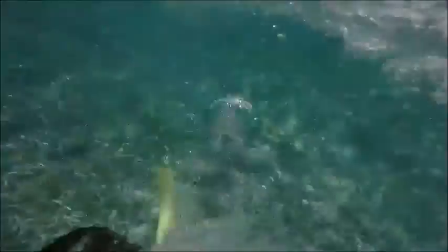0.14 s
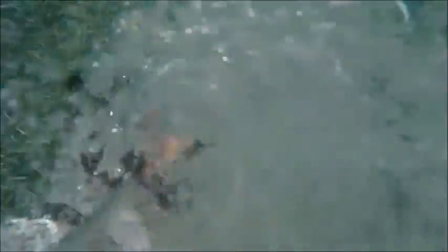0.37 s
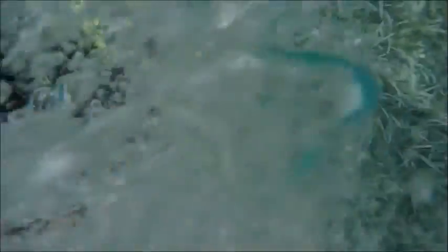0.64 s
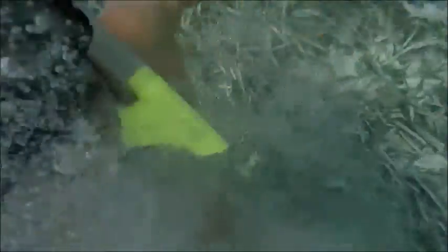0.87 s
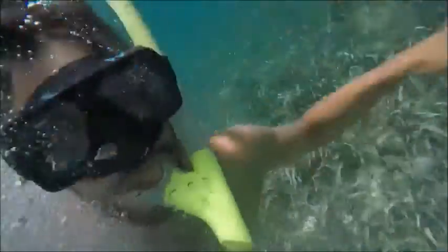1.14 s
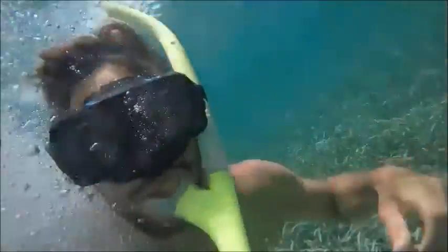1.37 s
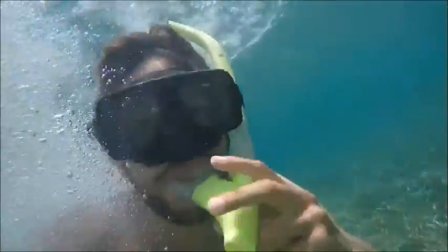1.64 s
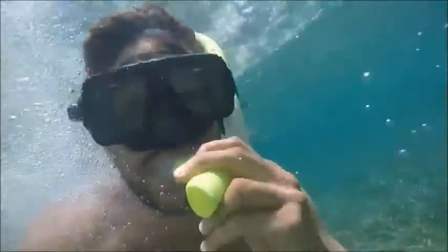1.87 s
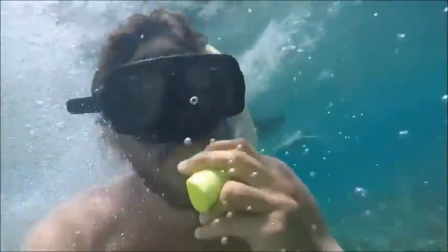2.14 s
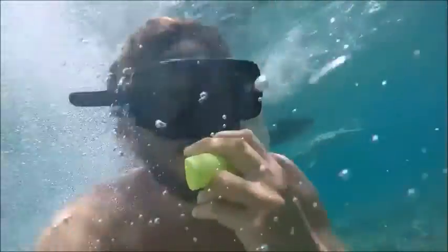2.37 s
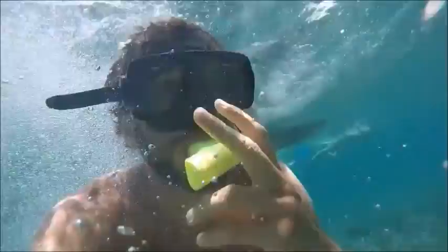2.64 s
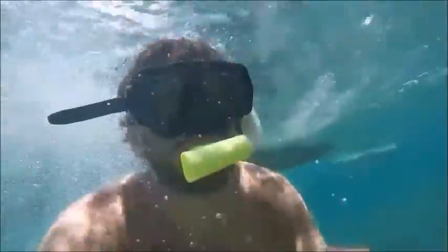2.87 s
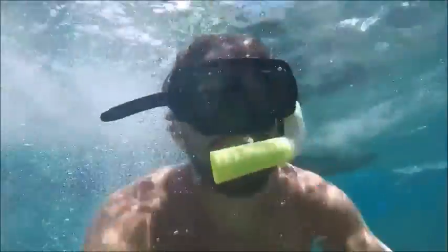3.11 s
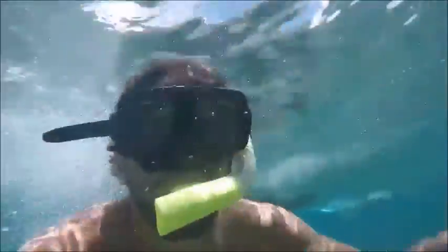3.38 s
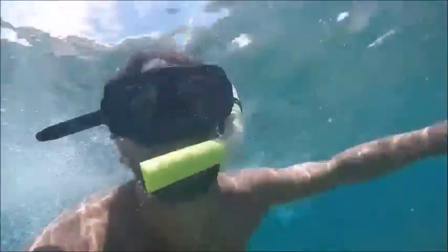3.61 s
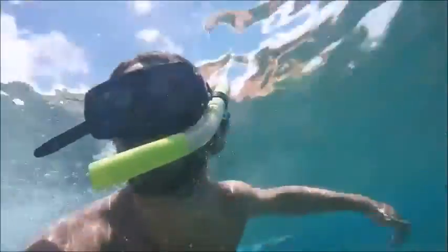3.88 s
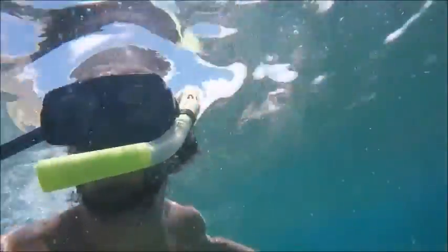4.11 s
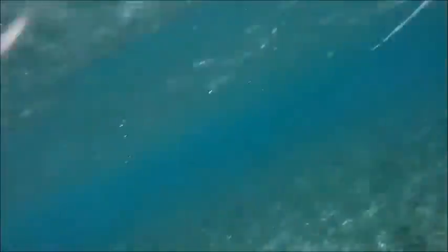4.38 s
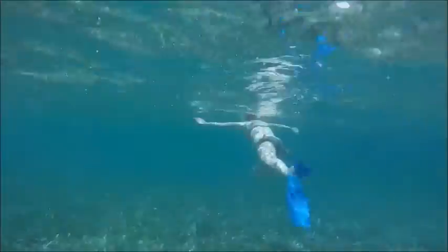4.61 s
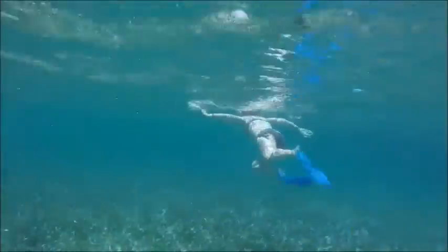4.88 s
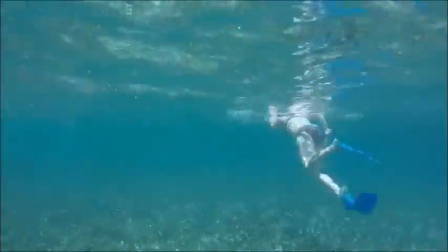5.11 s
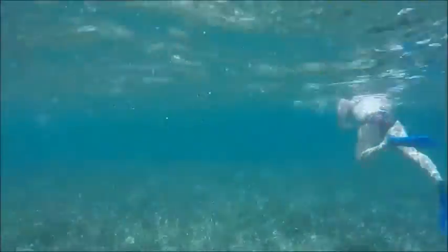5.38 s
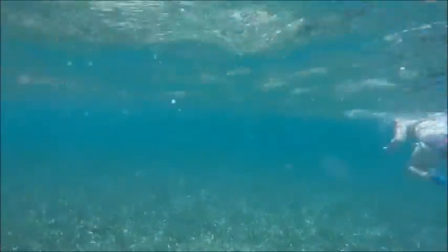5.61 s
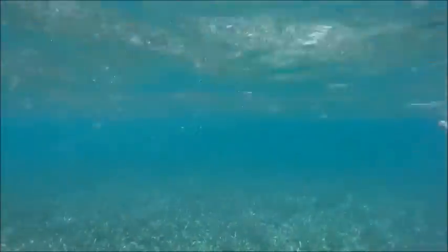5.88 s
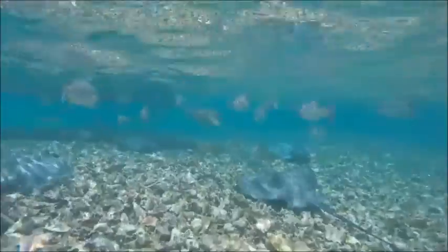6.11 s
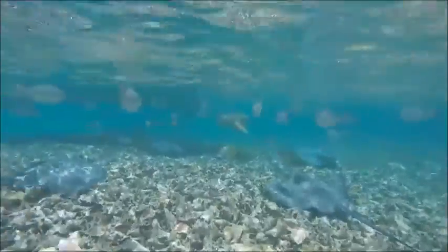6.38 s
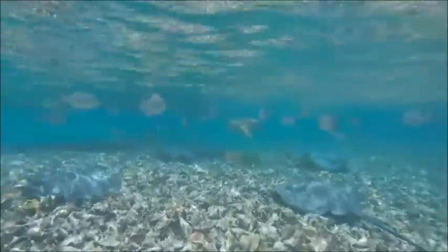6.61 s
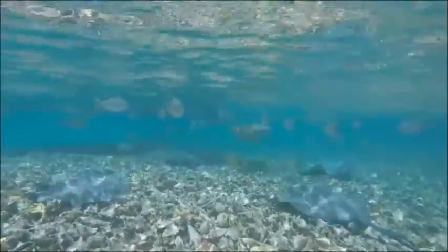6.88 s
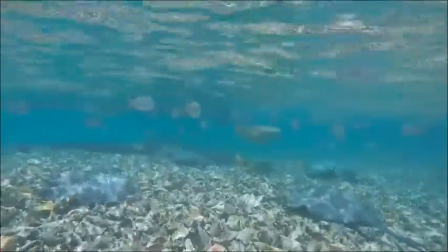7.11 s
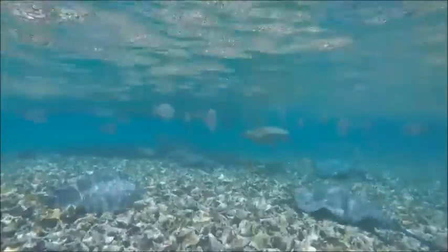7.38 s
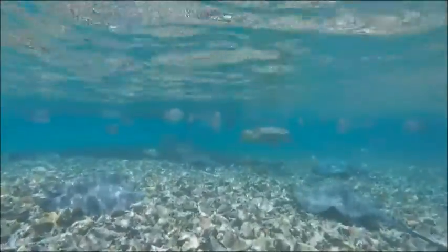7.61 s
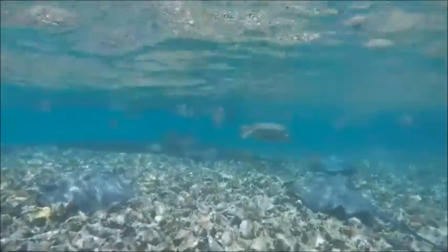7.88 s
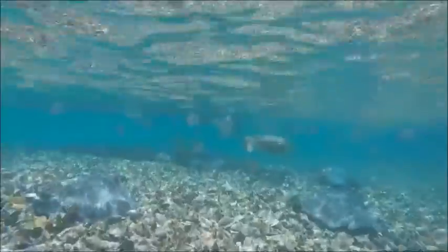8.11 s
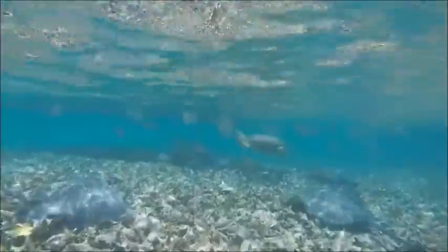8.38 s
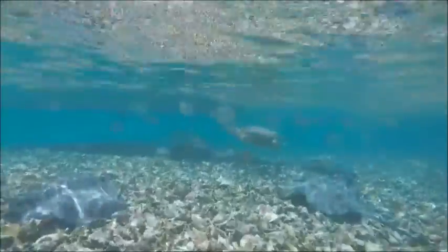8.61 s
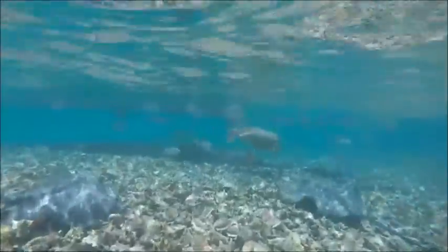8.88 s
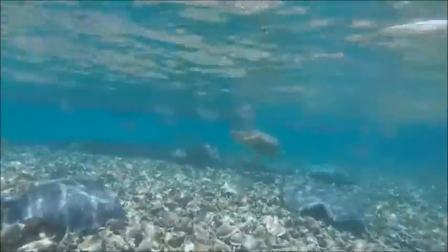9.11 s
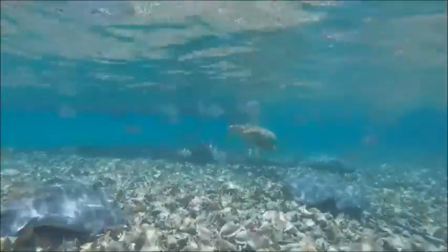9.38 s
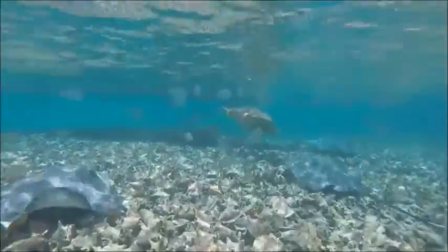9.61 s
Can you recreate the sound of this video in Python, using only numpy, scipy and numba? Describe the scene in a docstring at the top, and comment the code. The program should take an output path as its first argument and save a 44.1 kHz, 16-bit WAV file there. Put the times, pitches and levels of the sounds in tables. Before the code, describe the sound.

Violent splash and crackling spray plunge underwater, followed by dull bubbling, a second burst of glugs, deep watery thumps and a faint reef crackle.

```python
"""Camera plunging into the sea

A small camera in a plastic housing plunges and is carried along under the surface. Slams, slosh, bubbles
and glugs are swelling, decaying tones; spray, wash and sea are coloured noise with fine tones; ticks and
swishes ring the shell with noise bursts; pops are short high tones; a faint reef crackles in the sea's hiss."""
import sys
import numpy as np
from scipy import signal
from scipy.fft import rfft, irfft, next_fast_len
from scipy.io import wavfile
from scipy.ndimage import uniform_filter1d
from numba import njit

SR = 44100
rng = np.random.default_rng(int(sys.argv[2]) if len(sys.argv) > 2 else 0)


def pcm_store(signal):
    """Save signal as 16-bit PCM."""
    levels = np.round(np.clip(np.atleast_2d(signal), -1, 1) * 32767)
    wavfile.write(sys.argv[1], SR, levels.astype(np.int16).T)


def invert_db(level):
    """Linear amplitude ratio for a level in decibels (20 dB per decade), elementwise."""
    return 10 ** (np.asarray(level, dtype=float) / 20)


N = 429975
TIME = np.arange(N) / SR

# air escaping from the housing: time_s, gurgle_db, typical_pitch_hz
ESCAPING_AIR = [(0.0, -29.5, 460), (0.199, -33, 588), (0.42, -23, 492), (0.659, -24, 449.4),
                (0.8, -19.5, 463.6), (1.25, -29, 447), (1.52, -38.5, 492), (1.651, -33.5, 363.2),
                (2.2, -29, 445.6), (2.451, -41.5, 510), (3.248, -38, 557.6), (3.37, -41.5, 484),
                (3.383, -20, 505.4), (3.87, -19, 510.4), (3.92, -26, 465.8), (4.198, -37.5, 530),
                (4.701, -49.5, 562.3), (5.301, -40.5, 558.5), (5.699, -47.5, 463.3), (6.0, -49, 451),
                (6.898, -69.5, 389.5), (7.3, -57.5, 401), (7.6, -60, 344.6), (8.44, -68, 329.8),
                (8.499, -50.5, 383.2), (8.799, -53.5, 427.3), (8.98, -65, 398.8), (9.75, -55, 392.8)]
# resonances of the air left in the housing: pitch_hz
POCKET_PITCH_HZ = (405, 620)
# their share of the gurgle: early_gain, late_gain
POCKET_GAIN = (.25, 1.1)
# steady drift of the camera through the water: time_s, slosh_db
DRIFT_LEVEL = [(0.0, -40), (0.2, -33), (1.25, -41.5), (1.35, -34), (3.3, -34), (4.2, -30), (5.9, -32),
               (6.1, -43), (9.75, -48.5)]
# surges as the camera is swung: middle_s, length_s, slosh_db, buffet_share_db
SWING_SURGES = [(0.095, 0.14, -15.5, 3), (0.263, 0.053, -16.5, -5), (0.434, 0.11, -19, 2.5),
                (0.773, 0.32, -30, -1.5), (3.414, 0.053, -27, 9), (3.55, 0.34, -39.5, 17.5),
                (3.868, 0.16, -27, -26), (4.274, 0.074, -39, 6), (4.412, 0.18, -19.5, -19),
                (4.586, 0.12, -24.5, -21), (4.824, 0.11, -23, -38), (5.042, 0.09, -24, -26),
                (5.425, 0.26, -17.5, -23.5), (5.71, 0.13, -18.5, -26), (5.868, 0.19, -19, -23.5),
                (6.312, 0.5, -39.5, -4.5), (6.937, 0.053, -31.5, -12.5), (7.196, 0.22, -34.5, -6.5),
                (7.388, 0.21, -43.5, -1.5), (7.805, 0.33, -35, -5), (8.007, 0.47, -34, -9),
                (8.538, 0.21, -40.5, -6), (8.908, 0.31, -37.5, -8.5), (9.095, 0.09, -51.5, 9.5),
                (9.454, 0.14, -33, -9.5), (9.569, 0.088, -26.5, -12.5)]
# sheets of spray hitting the shell: peak_s, level_db, fade_db_per_s, treble_share_db
SPRAY_SHEETS = [(0.0, -22.5, 57.5, 1.5), (0.073, -14, 150.5, 0), (0.115, -27.5, 124, -6),
                (0.151, -32, 319, -2), (0.238, -27.5, 198.5, -16), (0.28, -32.5, 253, 3.5),
                (0.346, -28, 49.5, -6.5), (0.45, -33, 72, -18.5), (0.74, -34.5, 300, -11),
                (0.774, -24.5, 66, -10.5), (0.985, -36, 198.5, -5), (1.04, -54, 58, -25)]
# spectrum of the spray body: freq_hz, density_db_per_hz
SPRAY_SPECTRUM = [(530, -14.5), (900, -0.5), (1240, -12.5), (1730, 0.5), (2680, -3.5), (3110, -8),
                  (3670, -11), (4060, -26), (5000, -24.5), (6500, -42.5), (11000, -120)]
# spectrum of spray, crack and swish treble: freq_hz, density_db_per_hz
TREBLE_SPECTRUM = [(2350, -27.5), (4000, -1.5), (7140, -7.5), (13100, -18), (15200, -20.5), (16000, -37.5)]
# spectrum of the sea's hiss: freq_hz, density_db_per_hz
SEA_SPECTRUM = [(88, -44.5), (150, 1.5), (275, -34.5), (578, 4), (702, -8.5), (1140, -23), (1360, -5),
                (1900, -14.5), (2180, -1.5), (2700, -17), (3550, -11.5), (4580, -17.5), (13200, -27),
                (14800, -29), (16000, -41)]
# ticks on the shell: start_s, level_db, pitch_hz, crack_share_db
SHELL_TICKS = [(0.042, -7, 2260, -7.5), (0.075, 6, 2710, -11), (0.244, -17, 1769, -33),
               (0.33, -15, 3300, -23.5), (0.474, -11, 1960, -42), (0.529, -17.5, 2660, -38),
               (0.656, -8, 2370, -79), (0.741, -4.5, 3386, -16), (0.7726, -5, 2530, -17.5),
               (0.833, -21, 2500, -13), (0.901, -13.5, 2490, -21.5), (0.9533, -25, 2480, -21),
               (0.967, -27.5, 2520, -14.5), (1.027, -24.5, 2600, -23), (1.046, -22.5, 4180, -15.5),
               (1.081, -30.5, 3620, -23.5), (1.2382, -29.5, 3360, -34.5), (1.2589, -31.5, 1753, -27),
               (1.46, -34.5, 1470, -42), (2.321, -31.5, 2123, -50), (2.485, -33.5, 2150, -47),
               (2.806, -34.5, 1820, -37), (2.815, -26.5, 2580, -21), (2.992, -32.5, 1700, -48),
               (3.1475, -24, 1756, -40), (3.55, -29, 1580, -32), (3.568, -31, 3700, -46),
               (3.5939, -24, 2270, -32.5), (3.629, -29, 2210, -47), (4.2, -29, 2140, -34),
               (4.346, -27.5, 1790, -35), (4.3686, -19.5, 3700, -22), (4.407, -27.5, 1290, -13),
               (4.416, -25, 2550, -22.5), (4.4288, -21, 2580, -25.5), (4.441, -26, 2650, -24),
               (4.556, -10.5, 2450, -69), (4.5703, -24.5, 2300, -27.5), (4.5845, -17.5, 1210, -45),
               (4.659, -28.5, 2210, -33), (4.673, -18, 2400, -44), (4.8822, -33.5, 2890, -41),
               (5.323, -30.5, 2990, -16.5), (5.356, -29, 1670, -39), (5.366, -29.5, 2950, -20),
               (5.4313, -21.5, 1410, -37), (5.437, -19, 2280, -49), (5.513, -18, 2480, -13),
               (5.682, -25.5, 4350, -10), (6.059, -36.5, 1800, -47), (6.1347, -19.5, 2330, -11),
               (6.207, -34, 1485, -37.5), (6.701, -29.5, 2276, -37), (6.8154, -37, 2530, -30),
               (6.9387, -38.5, 3410, -22), (6.9865, -37.5, 2150, -30), (7.014, -32, 2310, -40),
               (7.2375, -37.5, 2300, -40), (7.3347, -37, 1754, -30), (7.3508, -38.5, 3360, -32),
               (8.08, -36, 2514, -36.5), (8.1664, -33.5, 2400, -35), (8.4334, -34, 2300, -14.5)]
# modes of the plastic shell: pitch_hz, relative_level_db, ring_s (to -60 dB)
SHELL_MODES = [(1500, -6, .012), (2300, -2, .014), (2600, 0, .014), (3000, -6, .014), (3600, -5, .014),
               (4300, -10, .008), (5400, -12, .006)]
# slams of water on the port: start_s, level_db, pitch_hz, cycles (half the fall to -60 dB)
WATER_SLAMS = [(0.073, 6.5, 84, 1.3), (0.076, -19, 83, 2.0), (0.412, 6.5, 76, 0.7), (3.375, -8, 33, 0.85),
               (4.438, -5, 19.2, 1.6), (5.376, -3.5, 13.6, 0.93), (5.455, -8, 21.4, 4.3),
               (6.258, -19, 31, 2.1), (6.354, -20.5, 34.4, 2.8), (7.38, -22.5, 49, 5),
               (7.725, -21, 30, 1.1), (7.929, -19.5, 53, 5.4), (9.446, -20.5, 46, 4.15),
               (6.924, -40, 140, .6), (7.116, -31.5, 120, 0.69), (8.19, -38, 150, 0.54),
               (8.483, -33.5, 134, .6), (8.89, -40, 140, 0.67), (9.577, -32, 130, 0.65)]
# droplets and tiny bubbles popping on the shell: start_s, level_db, pitch_hz
SHELL_POPS = [(0.186, -30, 4600), (0.255, -32, 14500), (0.2784, -23, 5200), (0.3547, -29, 7400),
              (0.3652, -21, 4500), (0.3736, -24, 5500), (0.3811, -32, 5500), (0.396, -17, 3820),
              (0.4061, -29, 5500), (0.4168, -19, 5500), (0.445, -17.5, 5260), (0.4864, -39, 5500),
              (0.5443, -41, 4800), (0.568, -45, 9250), (0.606, -40, 11600), (0.7476, -37, 6200),
              (0.7878, -24, 10100), (0.8042, -30, 10500), (0.8266, -31, 5200), (0.8408, -26.5, 10200),
              (0.8765, -32, 6240), (0.9017, -16.5, 4230), (0.9369, -41, 4750), (0.9533, -32, 14500),
              (0.984, -36, 12600), (1.0288, -22.5, 4900), (1.1484, -37, 4300), (1.1703, -39, 9800),
              (1.2467, -40, 4430), (1.2741, -43, 14600), (1.372, -37.5, 3410), (1.466, -36.5, 4700),
              (1.6076, -38, 3980), (1.9907, -42.5, 5900), (2.4953, -37.5, 3900), (3.8659, -46, 13000),
              (4.0962, -49.5, 9200), (4.3756, -26, 6300), (4.408, -34, 11500), (4.43, -32.5, 12100),
              (4.5701, -40, 12000), (4.6607, -32, 5100), (5.3796, -44, 7200), (5.494, -32.5, 6100),
              (5.5135, -36.5, 13450), (5.681, -46, 12870), (8.0388, -41.5, 4570)]
# large bubbles: time_s, level_db, pitch_hz, ring_ms (to -60 dB, before clipping to 8..100)
LARGE_BUBBLES = [(0.551, -13, 447, 60), (0.671, -15.5, 611.7, 48.5), (0.688, -11.5, 218.5, 88.5),
                 (0.745, -11, 217, 45), (0.831, -10, 735, 36), (0.958, -11, 498.7, 48.5),
                 (0.982, -14.5, 491, 38.5), (1.128, -19.5, 240, 46), (1.137, -16.5, 599, 50.5),
                 (1.37, -22.5, 412.7, 18.5), (1.911, -22, 337, 42), (2.005, -24, 422, 35.5),
                 (2.272, -22.5, 543, 27), (2.675, -22, 505, 26), (2.7, -21.5, 501, 27.5),
                 (2.73, -26, 518, 29), (2.94, -28, 597, 49.5), (3.043, -17, 579, 31), (3.08, -19, 613, 19),
                 (3.163, -27, 703, 24), (3.197, -22, 545, 50.5), (3.23, -25.5, 753, 37),
                 (3.384, -8, 404, 23.5), (3.394, -6.5, 537, 22.5), (3.504, -13, 571, 34.5),
                 (3.514, -8, 544, 34.5), (3.543, -9.5, 492, 31), (3.654, -8, 479, 21),
                 (3.682, -8, 493, 31.5), (3.722, -9.5, 552, 29), (3.785, -15.5, 590, 33.5),
                 (3.88, -16.5, 396, 20), (3.939, -14, 440, 27.5), (4.034, -12, 566, 34.5),
                 (4.259, -15.5, 548, 44), (4.318, -27.5, 664, 20), (4.428, -23.5, 298, 11),
                 (4.577, -20, 628, 46.5), (5.044, -14.5, 564, 39), (5.916, -32, 429, 51.5),
                 (7.727, -24.5, 194, 10), (8.64, -53, 390, 89.5), (9.216, -42, 574, 25.5),
                 (9.446, -37, 603, 6.5), (9.541, -36, 472, 20)]
# water washing over the sunk shell: time_s, level_db
WASH_LEVEL = [(1.0, -48), (1.4, -56), (1.75, -59.5), (3.07, -57.5), (3.41, -50.5), (3.559, -42), (3.8, -45),
              (4.089, -55.5), (4.5, -54), (5.6, -52), (6.36, -64), (7.04, -70), (9.75, -65.5)]
# spectrum of the wash: freq_hz, density_db_per_hz
WASH_SPECTRUM = [(470, -13), (800, 3), (940, 0), (1200, -19), (1380, -6), (1640, -2.5), (2350, -25.5),
                 (2760, -25.5), (3250, -16.5), (6430, -40), (12000, -42.5), (15500, -48.5)]
# swishes of fine bubbles as the shell turns: middle_s, length_s, level_db, treble_share_db
BUBBLE_SWISHES = [(3.06, 0.12, -49.5, -17), (4.389, 0.37, -53, -14), (4.657, 0.1, -59, 0),
                  (5.429, 0.19, -49, -10.5), (5.657, 0.035, -51.5, -7)]
# air pockets changing size as they slip out: start_s, level_db, start_pitch_hz, time_scale_s, rise_share
AIR_GLUGS = [(3.417, -3, 610, 0.03, -.25), (8.7, -43, 52, 0.307, 0.89), (8.97, -44.5, 75, 0.207, 1.67),
             (8.3, -56, 120, 0.138, 0.87)]


def unit(x):
    """Scale to rms 1."""
    return x / np.sqrt(np.mean(x ** 2))


def coloured(x, points):
    """Filter x by (freq_hz, level_db) points, joined on a log frequency axis; rms 1."""
    hz, db = np.transpose(points)
    size = next_fast_len(N)
    log_hz = np.log(np.arange(size // 2 + 1) * SR / size + 1)
    gain = invert_db(np.interp(log_hz, np.log(hz), db))
    return unit(irfft(rfft(x, size) * gain, size)[:N])


def band(x, lo_hz, hi_hz, order=2):
    """Butterworth band-pass."""
    return signal.sosfilt(signal.butter(order, [lo_hz, hi_hz], "bandpass", fs=SR, output="sos"), x)


def walk(rate_hz):
    """Random levels held 1 / rate_hz and smoothed twice; spread near 1."""
    k = int(SR / rate_hz)
    held = np.repeat(rng.standard_normal(N // k + 1), k)
    return 1.3 * uniform_filter1d(uniform_filter1d(held, k), k)[:N]


def together(*gains):
    """Gain of unrelated sounds heard at once: powers add."""
    return np.sqrt(sum(g ** 2 for g in gains))


def swell(middle_s, length_s, db):
    """Bell-shaped rise and fall."""
    return invert_db(db) * np.exp(-(2 * (TIME - middle_s) / length_s) ** 2)


@njit
def rings(start_s, hz, gain, swell_s, t60_s, glide, n):
    """Tones that swell, then decay, drifting in pitch by the share glide over their length."""
    y = np.zeros(n)
    for e in range(len(hz)):
        i0 = int(start_s[e] * SR)
        length = int((t60_s[e] + swell_s[e]) * SR) + 1
        fade = np.exp(-np.log(1000) / (t60_s[e] * SR))
        rise = int(swell_s[e] * SR) + 1
        phase, tail = 0., 1.
        for i in range(min(length, n - i0)):
            phase += 2 * np.pi * hz[e] * (1 + glide[e] * i / length) / SR
            if i > rise:
                tail *= fade
            y[i0 + i] += gain[e] * tail * np.sin(np.pi / 2 * min(i / rise, 1.)) ** 2 * np.sin(phase)
    return y


def swarm(count, lo_hz, hi_hz, cycles, swell, spread_db, glide, tune=lambda s: 1):
    """Tones at chance moments, of scattered pitch, level and glide; swell in cycles, tune scales pitch."""
    when, pitch, size, bend = rng.random((count, 4)).T
    s = when * N / SR
    hz = tune(s) * lo_hz * (hi_hz / lo_hz) ** pitch
    gain = invert_db(spread_db * size ** 2)
    return unit(rings(s, hz, gain, swell / hz, cycles / hz, glide * (2 * bend - 1), N))


def clicks(count, spread_db):
    """Impulses at chance moments with either sign, most of them small."""
    when, size, sign = rng.random((count, 3)).T
    return np.bincount((when * N).astype(int), invert_db(spread_db * size ** 2) * np.sign(sign - .5), N)


def shell(pulses):
    """The plastic housing rings briefly in its modes: decaying sines, convolved."""
    t = TIME[:2048]
    response = np.zeros(len(t))
    for hz, db, t60_s in SHELL_MODES:
        response += invert_db(db) * np.exp(-np.log(1000) * t / t60_s) * np.sin(2 * np.pi * hz * t)
    return signal.fftconvolve(pulses, response / np.abs(response).max())[:N]


def gurgle():
    """Escaping air as bubble tones: common, odd and big ones, pocket resonances and early froth."""
    s, _, pitch_hz = np.transpose(ESCAPING_AIR)
    # common bubbles: lo_hz and hi_hz are shares of the typical pitch
    common = swarm(count=2200, lo_hz=0.743, hi_hz=1.413, cycles=32.0, swell=3.22, spread_db=12.5,
                   glide=1.0, tune=lambda t: np.interp(t, s, pitch_hz))
    odd = swarm(count=3000, lo_hz=418.0, hi_hz=763, cycles=6.4, swell=2.3, spread_db=7.5, glide=0.033)
    big = swarm(count=900, lo_hz=182.0, hi_hz=304.0, cycles=5.4, swell=2.8, spread_db=13.0, glide=0.32)
    big_share = np.interp(TIME, [1, 2.7], [0.93, 0.57])  # the largest pockets thin out
    pocket = sum(unit(band(common + odd, .94 * hz, 1.06 * hz, order=1)) for hz in POCKET_PITCH_HZ)
    pocket_share = np.interp(TIME, [4, 6], POCKET_GAIN)
    # small bubbles of the plunge
    froth = swarm(count=2500, lo_hz=683, hi_hz=1380, cycles=7.9, swell=2.5, spread_db=11.5, glide=0.22)
    froth_share = np.interp(TIME, [.5, 1.51], [0.3, 0])
    mix = common + .8 * odd + big_share * big + pocket_share * pocket
    return unit(band(mix, 150, 750, order=4)) + froth_share * froth


def moving_water():
    """Eddies push the port slowly, buffet it faster, and shake gurgling air from the housing."""
    drift_buffet_db, shaken_air_db = -20.5, -18.5
    air_buffet_slope = 1.504  # buffeting by escaping air grows faster than its gurgle
    s, air_db, _ = np.transpose(ESCAPING_AIR)
    air_db = np.interp(TIME, s, air_db)
    drift = invert_db(np.interp(TIME, *np.transpose(DRIFT_LEVEL)))
    push = together(drift, *(swell(t, length, db) for t, length, db, _ in SWING_SURGES))
    jolts = together(*(swell(t, length, db + share_db) for t, length, db, share_db in SWING_SURGES))
    shake = together(jolts, invert_db(drift_buffet_db) * drift, invert_db(air_buffet_slope * air_db))
    air = together(invert_db(air_db), invert_db(shaken_air_db) * jolts)
    eddies = swarm(count=600, lo_hz=16.1, hi_hz=49.7, cycles=2.4, swell=0.59, spread_db=10.0, glide=0.092)
    slosh = unit(band(eddies, 11.7, 54))
    buffet = swarm(count=1200, lo_hz=63.9, hi_hz=142.0, cycles=10.4, swell=0.37, spread_db=9.0, glide=0.2)
    gulps = invert_db(3.0 * walk(28))  # the air comes out in uneven gulps
    return slosh * push + buffet * shake + gurgle() * air * gulps


def spray():
    """Drops slap and plink in gusts, fine ones tick in the treble; heavy spray merges into a roar."""
    rise_s, treble_fades_faster = 0.019, 1.61

    def sheet(s, db, fade_db_per_s):
        """Level of one sheet, growing to its peak at s and fading after it."""
        return np.clip((TIME - s) / rise_s + 1, 0, 1) * invert_db(db - fade_db_per_s * np.abs(TIME - s))

    near = together(*(sheet(s, db, fade) for s, db, fade, _ in SPRAY_SHEETS))
    bright = together(*(sheet(s, db + share_db, treble_fades_faster * fade)
                        for s, db, fade, share_db in SPRAY_SHEETS))
    roar = np.clip((20 * np.log10(near + 1e-9) + 38) / 14, 0, 1)
    calm = 1 - .65 * roar  # a roar is less gusty
    hiss = .2 + 1.5 * roar
    # each drop spreads over a few ms
    splats = unit(uniform_filter1d(np.abs(clicks(count=1500, spread_db=22.0)), size=160))
    drops = (splats + hiss) * rng.standard_normal(N) * invert_db(3.17 * calm * walk(35))
    plinks = swarm(count=3000, lo_hz=1230, hi_hz=5700, cycles=24.0, swell=2.0, spread_db=15.0, glide=0.28)
    fine = unit(clicks(count=2500, spread_db=18.0)) + hiss * rng.standard_normal(N)
    fine = fine * invert_db(4.5 * calm * walk(60))
    mist = swarm(count=2000, lo_hz=4260, hi_hz=10800, cycles=18.0, swell=0.87, spread_db=21.5, glide=.1)
    body = coloured(drops, SPRAY_SPECTRUM) + 0.55 * plinks
    treble = coloured(fine, TREBLE_SPECTRUM) + 0.89 * mist
    return invert_db(-2.5) * near * body + invert_db(-9) * bright * treble


def sea():
    """Smooth hiss of the water, with the soft, clustered crackle of the reef as short tones."""
    duck_db = -13 * (TIME <= 1.3)  # the hiss is held down until after the loud plunge
    hiss = coloured(rng.standard_normal(N), SEA_SPECTRUM) * invert_db(-61.5 + duck_db + 1.2 * walk(7.9))
    clusters = invert_db(2.2 * walk(9) - 4 * (TIME < 5.95))  # reef fainter at first
    grains = swarm(count=3000, lo_hz=1400, hi_hz=3870, cycles=12.0, swell=2.0, spread_db=19.0, glide=.1)
    return hiss + clusters * invert_db(-61.5) * grains


def ticks():
    """A ragged snap knocks the shell, rings at its own pitch and leaves a short crack and a scratchy tail."""
    s, db, hz, crack_db = np.transpose(SHELL_TICKS)
    at = (s * SR).astype(int)

    def burst(gain, tau_s):
        """Exponentially decaying envelope from every tick."""
        return signal.lfilter([1], [1, -np.exp(-1 / (tau_s * SR))], np.bincount(at, gain, N))

    own = rings(s, hz, invert_db(db - 3.5), 0 * s + .0012, 0 * s + .015, 0 * s - .06, N)
    hard_db = db + .3 * crack_db  # a tick that cracks also knocks the shell harder
    snap = burst(invert_db(hard_db - 9), 0.0022) + burst(invert_db(hard_db - 28), 0.0056)
    knock = shell(snap * rng.standard_normal(N))
    crack_level = uniform_filter1d(burst(invert_db(db + crack_db + 4.5), 0.0009), size=50, origin=10)
    crack = crack_level * coloured(rng.standard_normal(N), TREBLE_SPECTRUM)
    return own + band(knock, 980, 5700, order=4) + crack


def slams():
    """Each slam is a short decaying swing of pressure that sags in pitch."""
    s, db, hz, cycles = np.transpose(WATER_SLAMS)
    return rings(s, hz, invert_db(db), 0.51 / hz, cycles * 2 / hz, 0 * s - .2, N)


def pops():
    """Each pop is a brief high ring with a broad snap of two scattered tones around it."""
    s, db, hz = np.transpose(SHELL_POPS)
    pop = rings(s, hz, invert_db(db), 0 * s + .0005, 0 * s + 0.0041, 0 * s + .05, N)
    for ratio in rng.uniform(.6, 1.5, (len(s), 2)).T:
        snap_hz = np.minimum(hz * ratio, 15000)
        pop += rings(s, snap_hz, invert_db(db - 10.5), 0 * s + .0003, 0 * s + .003, 0 * s, N)
    return pop


def bubbles():
    """Large bubbles plop and knock as they pinch off, sag, and beat with a weaker neighbour of nearby pitch."""
    s, db, hz, ring_ms = np.transpose(LARGE_BUBBLES)
    ring_s = np.clip(ring_ms, 8, 100) / 1000
    swell_s = 0.1894 * ring_s
    main = rings(s - 0.6516 * swell_s, hz, invert_db(db), swell_s, ring_s, 0 * s - .15, N)
    neighbour_hz = hz * rng.uniform(0.76, 1.131, len(s))
    neighbour = rings(s + 0.002754, neighbour_hz, invert_db(db - 3.5), swell_s, 0.68 * ring_s, 0 * s + 0.038, N)
    plop = rings(s, 0.66 * hz, invert_db(db - 4.5), 0.8 / hz, 3.5 / hz, 0 * s, N)
    knock = rings(s, 0 * s + 560, invert_db(db - 9.5), 0 * s + 0.0018, 0 * s + 0.015, 0 * s, N)
    return main + neighbour + plop + knock


def wash():
    """Smooth flow noise heard through the resonant shell, with a little fizz of short tones."""
    s, db = np.transpose(WASH_LEVEL)
    fizz = swarm(count=1500, lo_hz=1220, hi_hz=3760, cycles=40.0, swell=3.0, spread_db=16.0, glide=.1)
    flow = coloured(rng.standard_normal(N), WASH_SPECTRUM) * invert_db(1.8 * walk(30))
    return invert_db(np.interp(TIME, s, db, left=-120)) * (flow + .3 * fizz)


def swishes():
    """Scratchy bursts of tiny bubbles that excite the shell and hiss above it."""
    grit = unit(clicks(count=12000, spread_db=21.0)) + 1.1 * rng.standard_normal(N)
    body = unit(band(shell(grit), 1000, 2500, order=1))
    treble = coloured(grit, TREBLE_SPECTRUM)
    y = np.zeros(N)
    for s, length_s, db, treble_db in BUBBLE_SWISHES:
        level = invert_db(db) * np.exp(-(2.95 * (TIME - s) / length_s) ** 2)
        y += level * (body + invert_db(treble_db) * treble)
    return y


def glugs():
    """Each glug swells slowly and dies fast while its pitch glides with the size of the air pocket."""
    s, db, hz, scale_s, rise = np.transpose(AIR_GLUGS)
    return rings(s, hz, invert_db(db), 0.663 * scale_s, .6 * scale_s, rise, N)


def scene():
    """All sources at the single microphone."""
    first = moving_water() + spray() + sea() + ticks() + slams()
    later = pops() + bubbles() + wash() + swishes() + glugs()
    return (first + later)[None]


def top_cut(x):
    """Nothing passes above the cut-off."""
    return signal.sosfilt(signal.butter(12, 16500, fs=SR, output="sos"), x)


def record(dry):
    """The input stays clean until the hardest slams overload it: smooth limiting toward +-1."""
    limited = dry / (1 + dry ** 6) ** (1 / 6)
    return top_cut(limited)


dry = scene()
out = record(dry)
pcm_store(out)
```